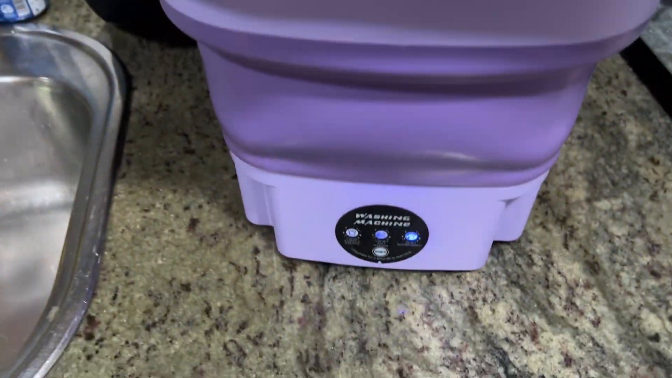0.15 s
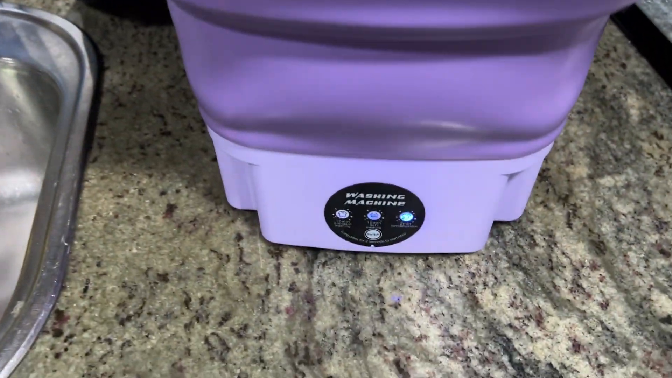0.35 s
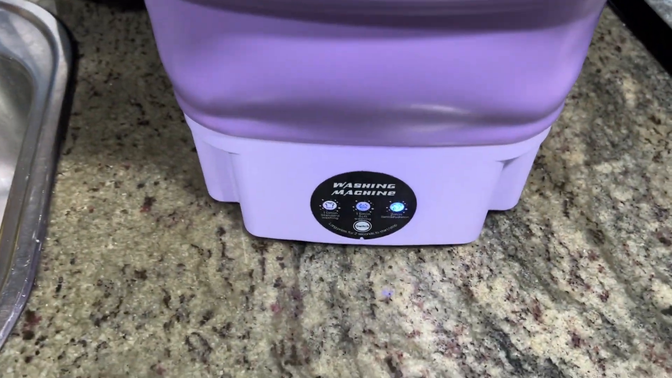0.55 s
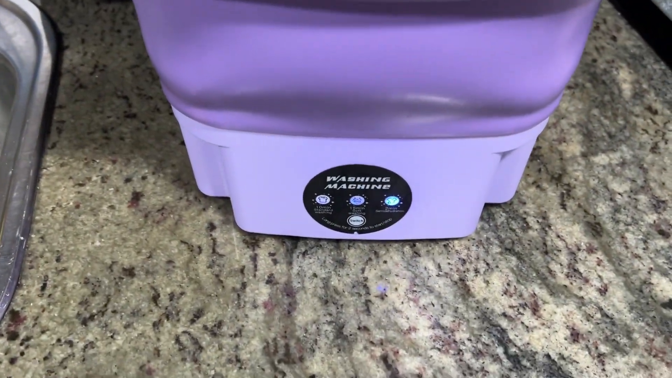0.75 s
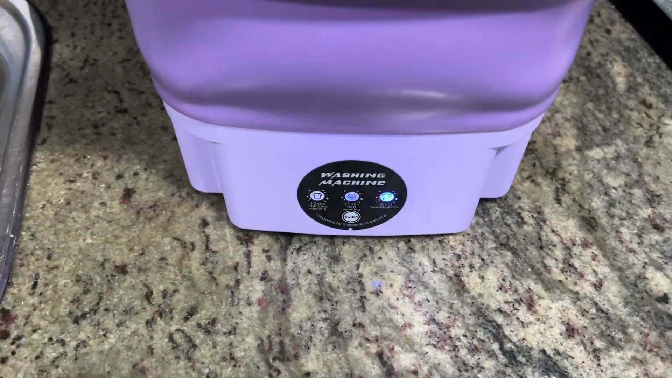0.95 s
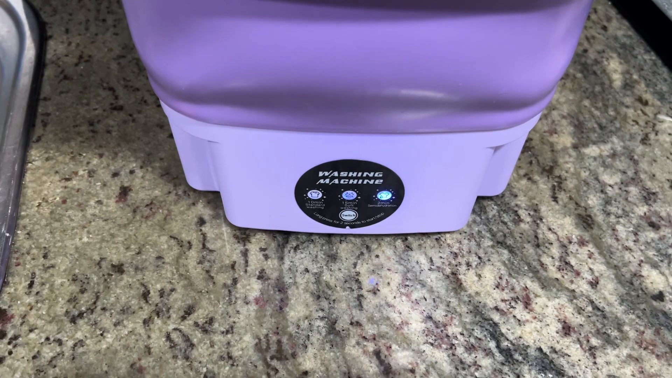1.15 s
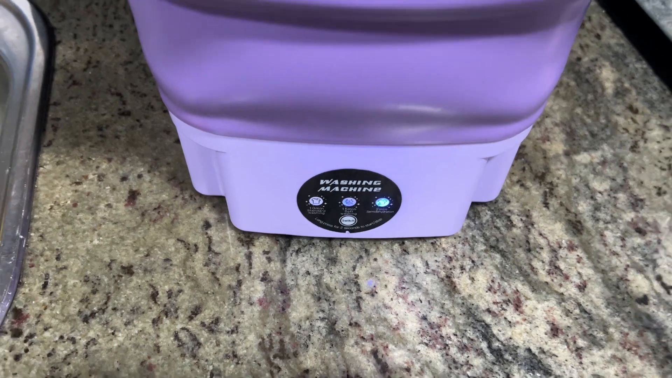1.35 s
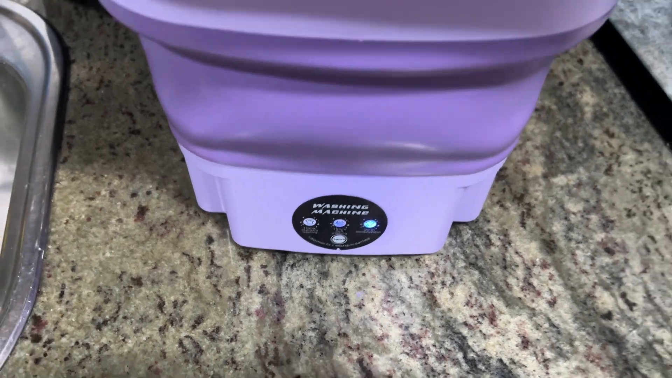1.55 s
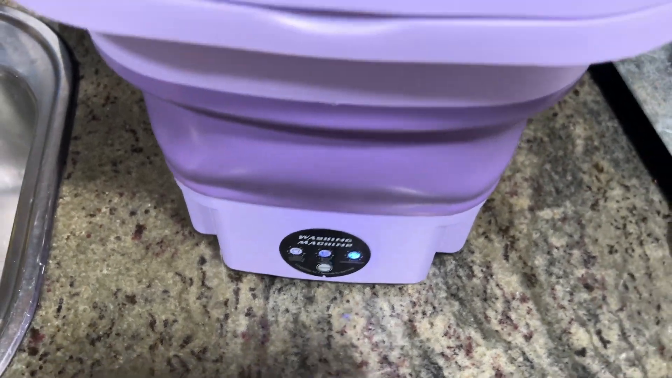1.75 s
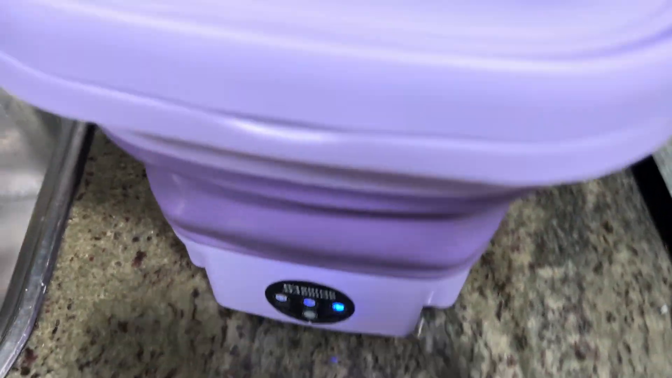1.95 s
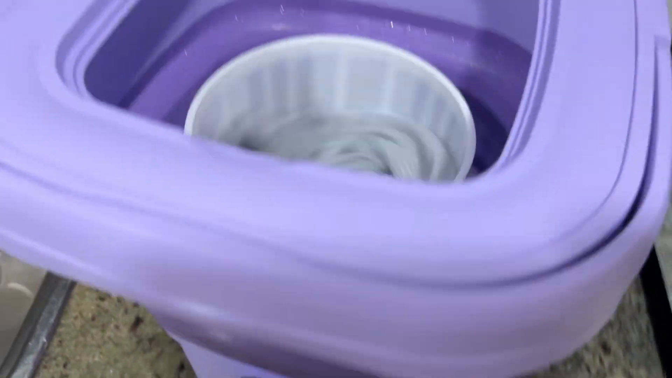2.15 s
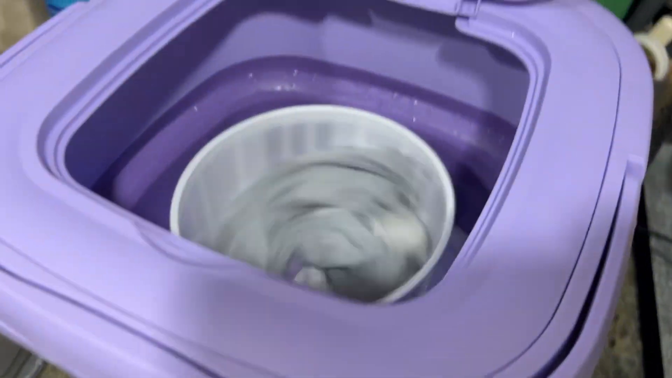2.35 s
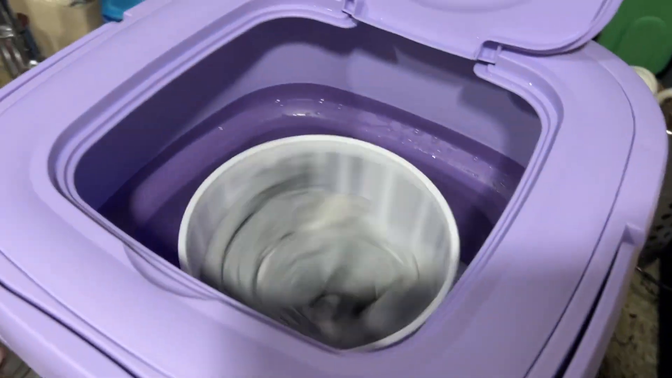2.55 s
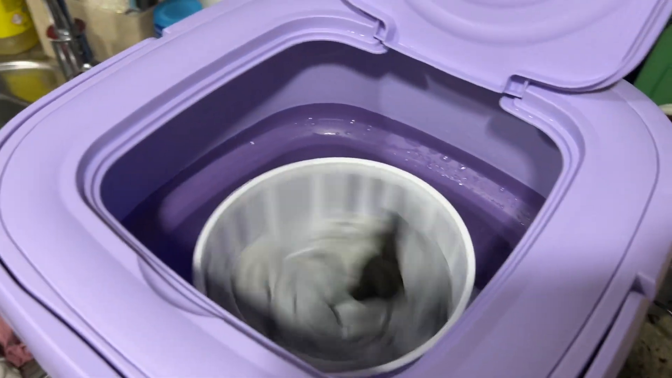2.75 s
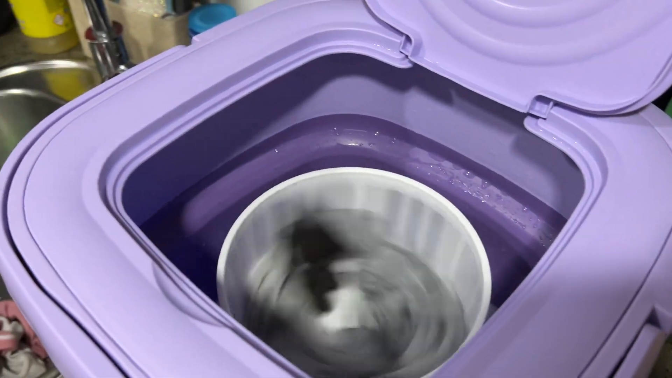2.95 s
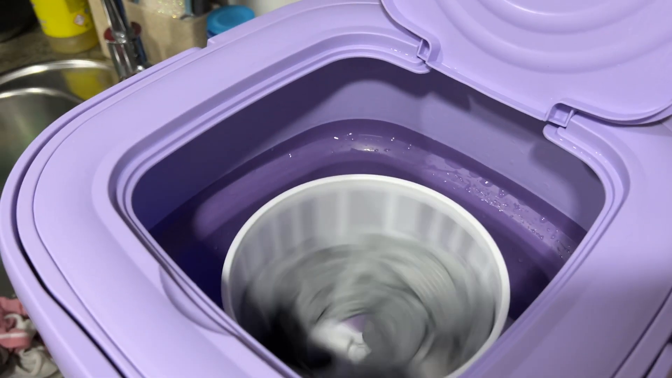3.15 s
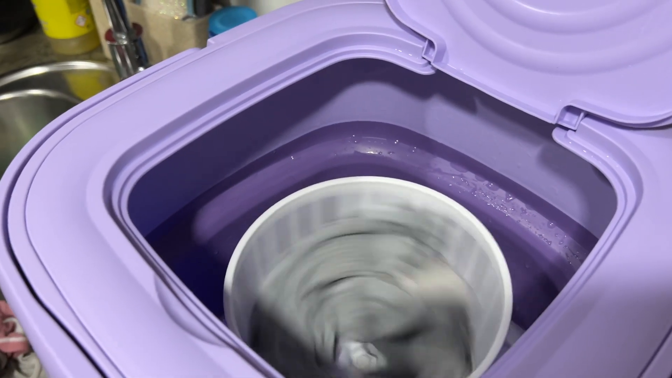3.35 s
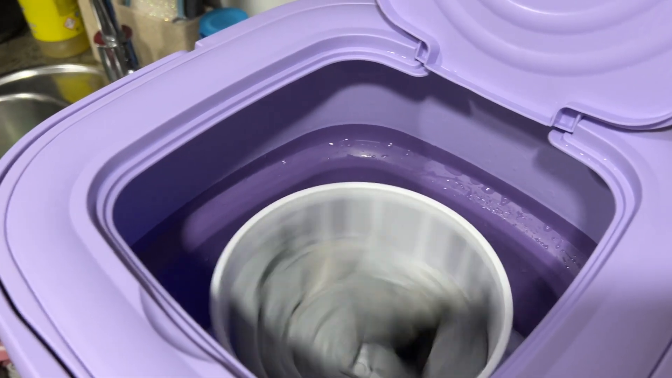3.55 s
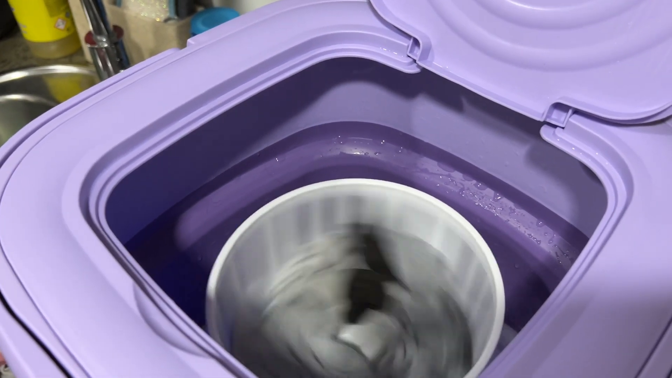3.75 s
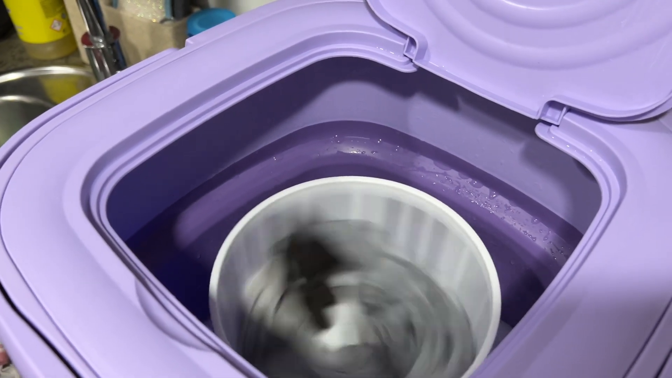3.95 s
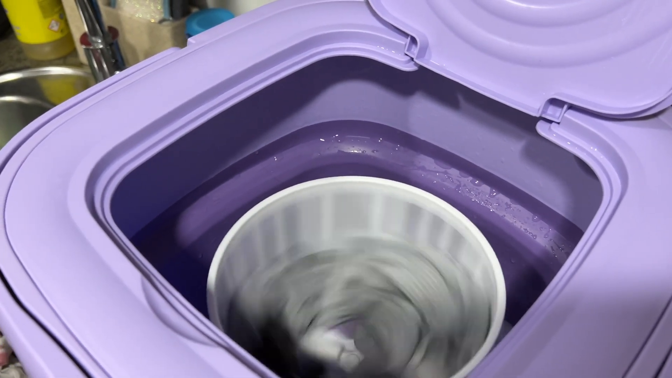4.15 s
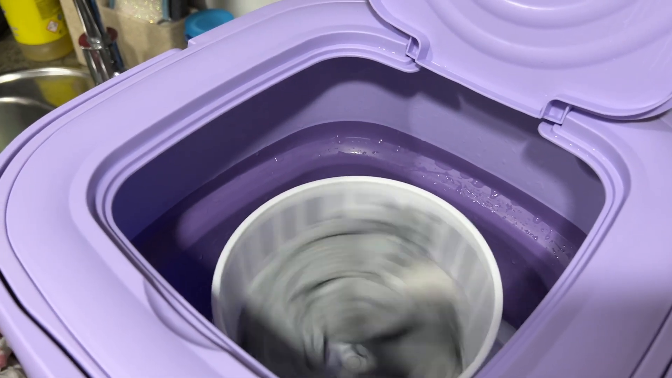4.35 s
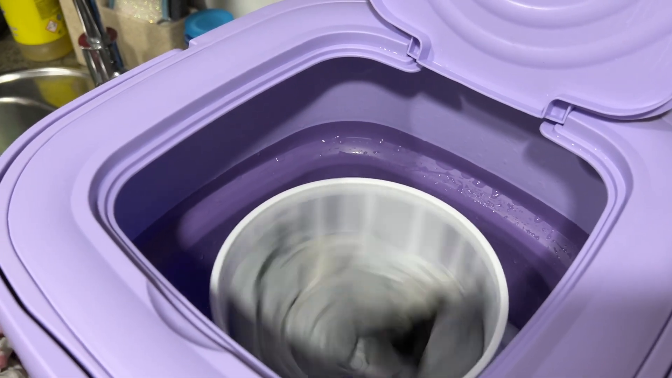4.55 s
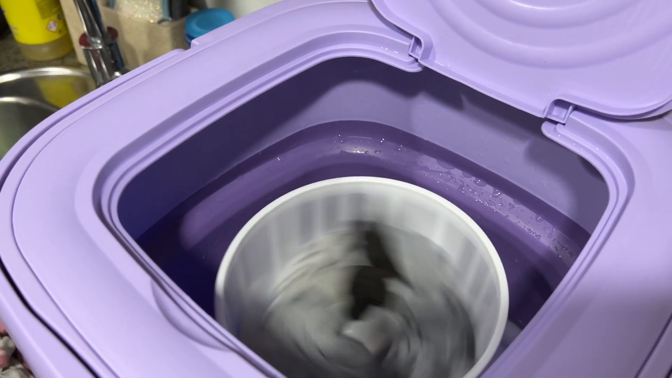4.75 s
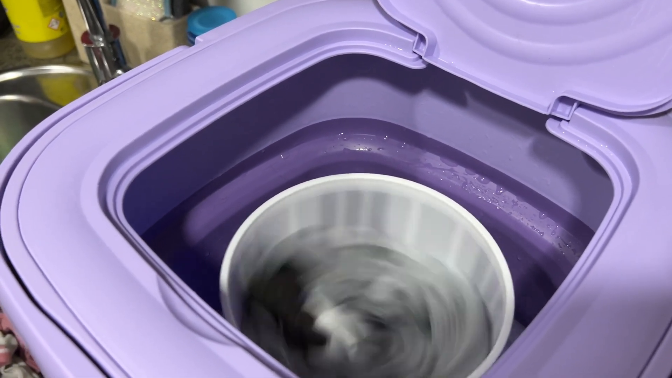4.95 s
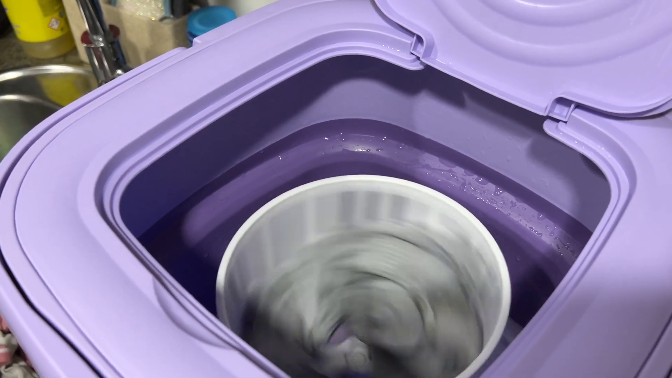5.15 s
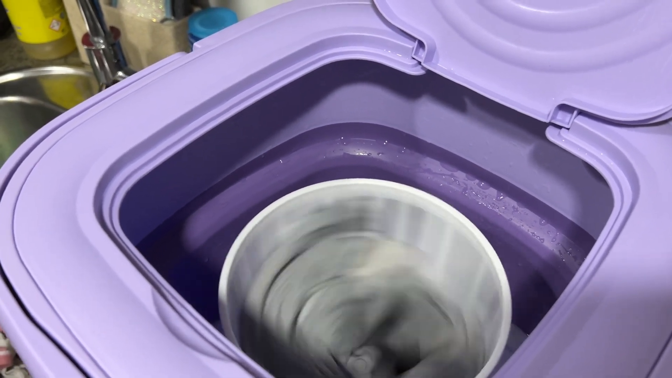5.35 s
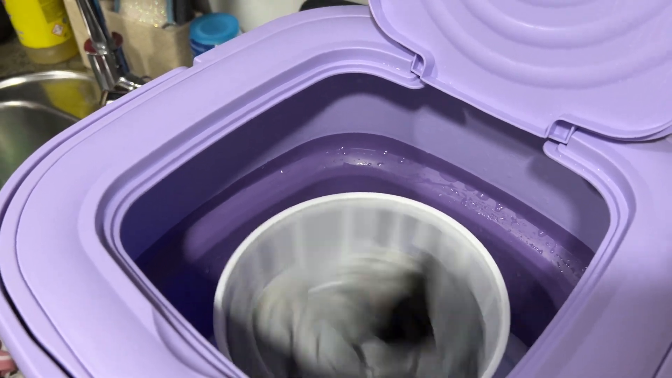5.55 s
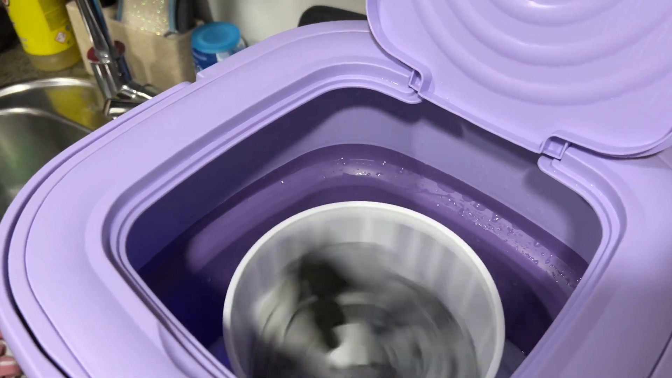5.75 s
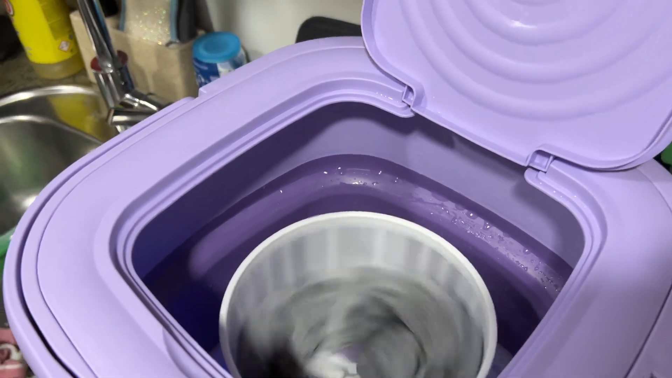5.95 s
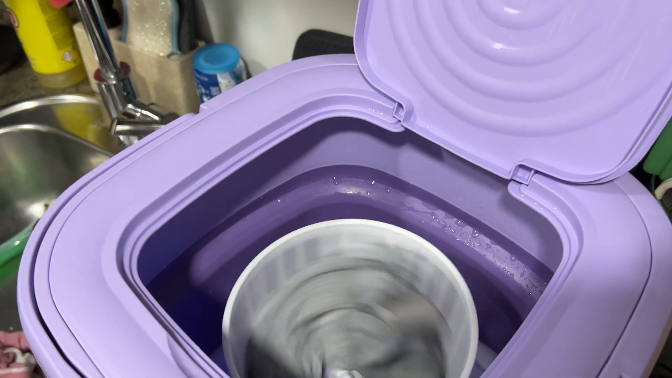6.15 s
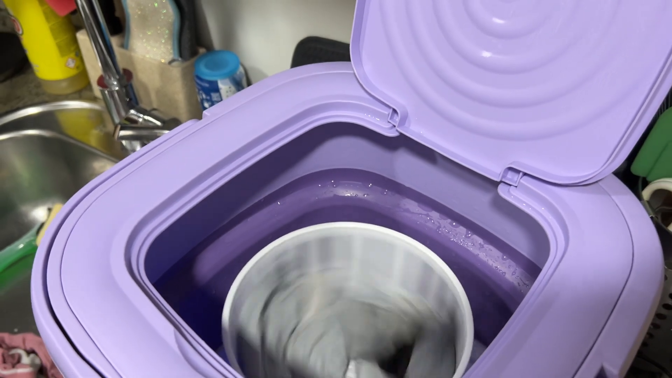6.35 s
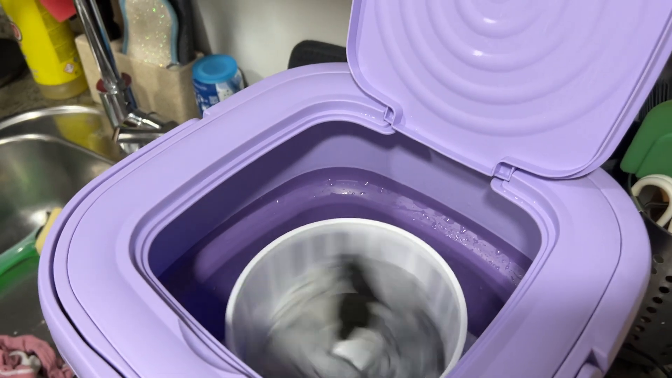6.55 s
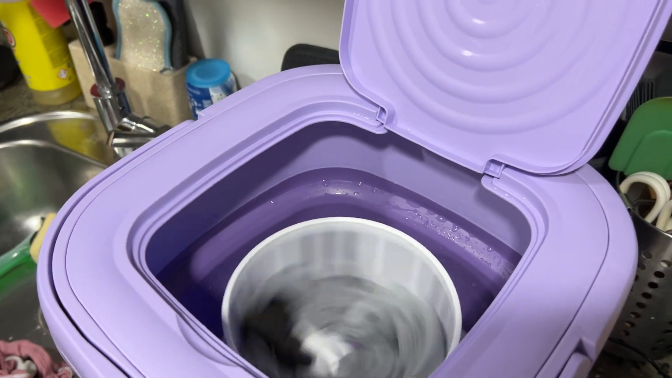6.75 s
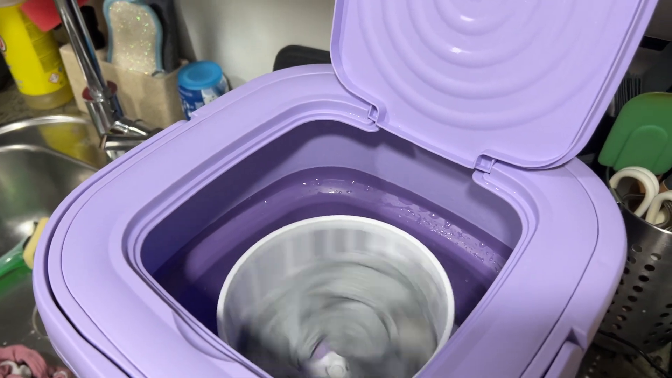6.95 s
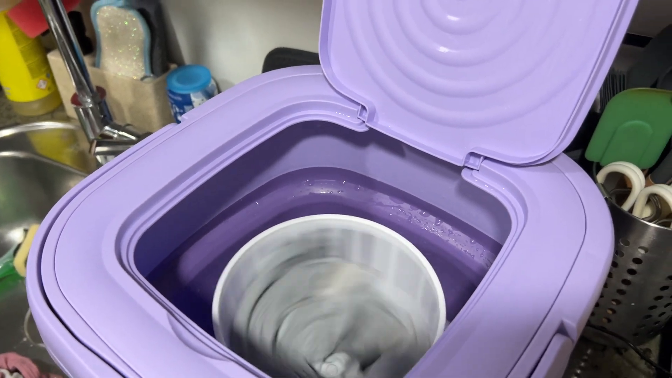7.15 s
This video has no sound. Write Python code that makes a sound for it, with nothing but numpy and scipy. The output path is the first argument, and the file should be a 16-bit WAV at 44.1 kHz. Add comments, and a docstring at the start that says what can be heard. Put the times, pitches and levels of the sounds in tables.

```python
"""A small motor hums and rattles in a folding plastic mini washing machine on a kitchen counter.
The microphone rises from its front to above the open tub, where the second motor order booms.
The pinion whines in short bursts and the gear train rattles in the case and tub, throbbing with an off-centre
gear and an unevenly loaded drum. Hiss, low rumble, soft handling bumps, one tick and a thin ring are added."""
import sys
import numpy as np
from scipy import signal
from scipy.fft import rfft, irfft
from scipy.io import wavfile

SR = 44100
rng = np.random.default_rng(int(sys.argv[2]) if len(sys.argv) > 2 else 0)


def generate_wav(signal):
    """Clip the signal to [-1, 1] and save it as 16-bit WAV at the path in sys.argv[1]."""
    frames = np.transpose(np.atleast_2d(signal))
    scaled = np.clip(frames, -1, 1) * 32767
    pcm = np.round(scaled).astype(np.int16)
    wavfile.write(sys.argv[1], SR, pcm)


N = 317520
T = np.arange(N) / SR
FREQS = np.maximum(np.arange(N // 2 + 1) * SR / N, 1)

MOTOR_HZ = 249.95
PINION_TEETH, GEAR_RATIO, DRUM_RATIO = 10, 16.795, 40.97  # ratios: motor turns per turn
REPEAT_TURNS = 84  # motor turns until the same teeth meet again

# parts heard along the path: front_db, rim_db, above_tub_db, edge_change_db, follow_db_per_db of closeness
PART_LEVELS = {"case": (-49, -49.5, -49, -2, 0.2), "tub": (-56, -53, -51, -0.5, 0),
               "gearbox": (-47.5, -46, -47, -0.5, 0.7), "warble": (-55.5, -47.5, -51.8, 3, 3),
               "whine overtones": (-60, -61, -56.5, -1, 0.5), "hiss": (-66.6, -64.5, -64.5, 1.7, 0.58),
               "first order": (-52, -50, -48.5, -0.5, 0.5), "third order": (-48.5, -51.5, -55.5, 4.5, 0.54)}


def undb(db):
    """Decibels to gain."""
    return np.exp(np.log(10) / 20 * np.asarray(db))


def unit(x):
    """Scale to an rms of one."""
    return x / np.sqrt(np.mean(x ** 2))


def curves(table):
    """The columns of a timed table, sample by sample."""
    s, *columns = np.transpose(table)
    return [np.interp(T, s, c) for c in columns]


def across(points):
    """Join (Hz, value) points on a log-frequency axis."""
    hz, value = np.transpose(points)
    return np.interp(np.log(FREQS), np.log(hz), value)


def resonances(modes):
    """Gain over frequency of a set of steep-sided resonances, summed in power."""
    power = 0
    for hz, width_hz, db in modes:
        detuning = (FREQS / hz - hz / FREQS) * hz / width_hz
        power = power + (undb(db) / (1 + detuning ** 2)) ** 2
    return np.sqrt(power)


def walk(rate_hz):
    """Smooth chance with a spread of one, changing about rate_hz times a second."""
    count = N // 50
    slow = rfft(rng.standard_normal(count))
    slow = unit(irfft(slow / (1 + (FREQS[:len(slow)] / rate_hz) ** 2), count))
    return np.interp(T, np.linspace(0, T[-1], count), slow)


def recurring(motor, chance, share):
    """A share of the chance comes round again whenever the same teeth meet, every REPEAT_TURNS motor turns."""
    place = (motor % REPEAT_TURNS * SR / MOTOR_HZ).astype(int)
    return np.sqrt(share) * chance()[..., place] + np.sqrt(1 - share) * chance()


def swing(turns, at):
    """Rises and falls once a turn, highest at the given share of the turn."""
    return np.cos(2 * np.pi * (turns - at))


def heave(turns, at, skew=0.33):
    """A swing that rises faster than it falls, as a lopsided load comes round."""
    return swing(turns, at) + skew * swing(2 * (turns - at), -1 / 4)


def by_place(height, place_db):
    """Blend the levels in front, at the rim and above the tub."""
    return np.interp(height, [0, .5, 1], place_db)


def tone(turns, lead_rad):
    """A clean tone of rms one at the two ports; the left leads by lead_rad."""
    return np.sqrt(2) * np.cos(2 * np.pi * turns + lead_rad * np.array([[.5], [-.5]]))


def panned(db, pan_db):
    """Left and right gains for a level and a left minus right difference."""
    return undb(db + pan_db * np.array([[.5], [-.5]]))


def ports(pair, gain=1):
    """Two unrelated signals become left and right: alike in the bass, diffuse higher, out of step at the top."""
    # likeness of the two microphone ports: pitch_hz, likeness 0-1
    likeness = [(30, 0.96), (60, 0.73), (300, 0.92), (600, 0.8), (1000, 0.68), (2000, 0.61), (3200, 0.051),
                (4500, 0.14), (7000, 0.14), (9500, 1), (15000, 1)]
    # phase of the ports: pitch_hz, left_lead_rad
    lead = [(20, 0), (6500, 0), (7800, -.6), (9300, -2.6), (10900, -3.6), (12800, -5.9), (14300, -6.8),
            (15500, -8.6)]
    # balance of the ports: pitch_hz, left_minus_right_db
    tilt = [(60, -2), (200, 1.5), (700, -1), (1290, 1), (1900, 0.5), (2450, -4), (3200, 0.5), (4400, 4),
            (8000, 1), (15000, -1)]
    like = across(likeness)
    mid, side = rfft(pair) * gain * np.sqrt([1 + like, 1 - like])
    left = undb(across(tilt) / 2) * np.exp(.5j * across(lead))
    return irfft(np.array([(mid + side) * left, (mid - side) / left]), N)


def tooth_load(gear, drum, gear_db=1.8, unsteady_db=1.25, give_db=7):
    """Tooth pressure in dB: the off-centre gear binds once a turn, hardest at a tight spot of the drum."""
    # where drum and gear bind together: drum_turn_share, drum_narrowness, gear_turn_share, gear_narrowness, push_db
    tight_spots = [(.12, 6, .27, .36, 7), (.4, 1.25, .08, 1.1, 7.2), (.7, 2.4, .17, 1.5, 4.7)]
    tight_db = 0
    for drum_at, drum_narrow, gear_at, gear_narrow, db in tight_spots:
        nearness = drum_narrow * (swing(drum, drum_at) - 1) + gear_narrow * (swing(gear, gear_at) - 1)
        tight_db = tight_db + db * np.exp(nearness)
    push_db = gear_db * swing(gear, 0.39) + tight_db - tight_db.mean() + unsteady_db * walk(50)
    return give_db * np.tanh(push_db / give_db)  # plastic teeth give way under the hardest pushes


def shafts(load_db, sag_per_db=0.0006, flutter=0.0006):
    """Turns of the motor: it sags by a small share for each dB of tooth load, and flutters."""
    return np.cumsum(MOTOR_HZ * (1 - sag_per_db * load_db - flutter * walk(25))) / SR


def boom(motor, drum, sway_db=0.92, waver_db=0.42):
    """The second order booms in the tub and heaves with the drum; at a node it dips, the ports nearly opposite."""
    # boom along the path, node just below the rim: time_s, level_db, left_minus_right_db, left_lead_rad
    boom_path = [(0, -54, -6, .7), (0.6, -48.3, -6.5, .75), (1.2, -49, -6.5, 1), (1.5, -52.3, -6, 1.4),
                 (1.63, -53, -1.5, 2.9), (1.7, -52.5, 2.5, 1.7), (1.8, -54, 8, 1.2), (2.0, -45, 3, .8),
                 (2.2, -35.7, -3, .4), (2.45, -33, 0.7, .2), (3.1, -30.5, 0.2, .15), (3.8, -30.5, 1.7, .15),
                 (4.9, -30.5, 1, .15), (5.8, -31, 0.6, .15), (6.5, -32, 1.1, .15), (7.15, -33.5, 2, .15)]
    level_db, pan_db, lead_rad = curves(boom_path)
    level_db = level_db + sway_db * heave(drum, 0.9) + waver_db * walk(36)
    return tone(2 * motor, lead_rad) * panned(level_db, pan_db)


def hum(motor, drum, levels_db, height, waver_db=-0.56):
    """The first and third motor orders, clean and swaying with the drum."""
    # clean orders: order, front_left_minus_right_db, above_tub_left_minus_right_db, left_lead_rad, sway_db,
    # peak_drum_turn_share
    clean_orders = {"first order": (1, -.8, .2, 0.075, -0.24, 0.82),
                    "third order": (3, 2.7, 18.6, 1.84, 0.79, 0.35)}
    out = 0
    for part, (order, front_pan_db, top_pan_db, lead_rad, sway_db, at) in clean_orders.items():
        db = levels_db[part] + sway_db * heave(drum, at) + waver_db * walk(36)
        pan_db = front_pan_db + (top_pan_db - front_pan_db) * height
        out = out + tone(order * motor, lead_rad) * panned(db, pan_db)
    return out


def knocks(motor, gain, lean_db, scatter_db, pole_db=0, worn=0.33):
    """Noise pulsed by shaft side, three motor poles and each tooth pair's own force rings a body; rms one."""
    count = PINION_TEETH * REPEAT_TURNS
    pair_index = (PINION_TEETH * motor).astype(int) % count
    fit = np.tanh(rng.standard_normal(count))[pair_index]
    force = undb(lean_db * swing(motor, 0) + pole_db * swing(3 * motor, 0) + scatter_db * fit)
    noise = recurring(motor, lambda: rng.standard_normal((2, N)), worn)
    return unit(ports(force * noise, gain))


def rattle(motor, drum, load_db, case_db, tub_db, height, panel_db=-55):
    """Tooth knocks ring the case, its front panel and the tub; the drum rocks case and tub twice a turn."""
    # plastic case: pitch_hz, width_hz, relative_db
    case_modes = [(240, 97, -5.5), (330, 170, -8), (738, 118, -5), (803, 42, 2), (832, 44, 1.3),
                  (912, 75, 0), (992, 70, -4), (1038, 55, -5)]
    # open tub: pitch_hz, width_hz, relative_db
    tub_modes = [(218, 45, -8), (368.5, 58, -3), (483.5, 78, 0.5), (1192, 70, -3), (1290, 130, -9),
                 (1428, 34, -6), (1524, 45, -6.5)]
    # front panel, fading as the microphone rises: pitch_hz, width_hz, relative_db
    panel_modes = [(1144, 450, 4.5), (1390, 120, -3), (1620, 160, 0), (3710, 1360, -7)]
    case = knocks(motor, resonances(case_modes), lean_db=-1.0, scatter_db=4.5, pole_db=2.0)
    tub = knocks(motor, resonances(tub_modes), lean_db=-9, scatter_db=-1.0)
    panel = knocks(motor, resonances(panel_modes), lean_db=-3, scatter_db=6.0)
    case = case * undb(case_db + 1.0 * swing(2 * drum, 0.057) + 0.12 * load_db)
    tub = tub * undb(tub_db + 1.3 * swing(2 * drum, 0.25) + 0.14 * load_db)
    panel = panel * (1 - height) * undb(panel_db + 0.26 * load_db)
    return case + tub + panel


def gearbox(motor, drum, load_db, gear_db, pinion_db, near_db):
    """Tooth knocks ring the gearbox and the pinion, and the teeth scrape in time with the load."""
    # gearbox: pitch_hz, width_hz, relative_db
    gear_modes = [(1755, 150, 4.5), (1882, 85, 6.5), (2001, 125, 6.5), (2245, 110, 0.5), (3170, 220, -1)]
    # pinion: pitch_hz, width_hz, relative_db
    pinion_modes = [(2534, 310, -1.5), (2790, 80, 2.5), (2917, 89, -1.5)]
    # gear wheels, rung by the scraping teeth: pitch_hz, width_hz, relative_db
    wheel_modes = [(2010, 120, 8), (3440, 170, 4), (3950, 400, -4)]
    # dry scrape of the teeth: pitch_hz, relative_db per Hz
    scrape_colour = [(300, -10.5), (600, -13), (1500, -3), (3000, -5.5), (3900, -2.5), (4500, -4.5),
                     (5400, -11), (6300, -11), (8500, -12), (12500, -13), (15500, -12.5)]
    ring = knocks(motor, resonances(gear_modes), lean_db=-1.0, scatter_db=3)
    pinion = knocks(motor, resonances(pinion_modes), lean_db=2.0, scatter_db=2.0)
    scrape_gain = np.hypot(undb(across(scrape_colour)), resonances(wheel_modes))
    scrape = knocks(motor, scrape_gain, lean_db=1.0, scatter_db=1.5, pole_db=1.0)
    ring = ring * undb(gear_db - 4.5 + 0.05 * load_db + 1.56 * swing(drum, 0.95))
    pinion = pinion * undb(pinion_db + 4.2 + 0.047 * load_db + swing(drum, 0.51))
    return ring + pinion + scrape * undb(-52.5 + near_db + 1.0 * load_db)


def tub_echo(x, drum, lag_s=0.0031, rock_s=0.00023, wander_s=0.00038, echo_db=-8):
    """The soft, rocking tub wall throws the works back with a changing delay, so the resonances waver."""
    late_s = T - lag_s - rock_s * swing(drum, 0.1) - wander_s * walk(2.98)
    echo = np.array([np.interp(late_s, T, channel) for channel in x])
    return (x + undb(echo_db) * echo) / np.hypot(1, undb(echo_db))


def buzz(motor, drum, load_db, height, flicker_db=4.5, sway_db=1.6, rock_db=3.0,
         shake_rad=0.095, smear_turns=0.013, glide_rad=0.06):
    """A smeared kick a turn makes higher motor orders, each answering load and the case's four rocks a drum turn."""
    # by motor order: front_db, rim_db, above_tub_db (all relative), follow_db_per_db of load, peak_drum_turn_share
    buzz_orders = {4: (-70, -60.5, -68.5, .5, .66), 5: (-54.5, -56.5, -58, -.8, .5),
                   6: (-64.5, -57.5, -58.5, .6, .98), 7: (-60.5, -57, -62.5, 0., .84),
                   8: (-67.5, -62, -65.5, .6, .02), 9: (-63.5, -70, -72, .7, .68),
                   11: (-70, -68, -64.5, 0., .6), 12: (-74, -72, -70.5, .2, .76),
                   18: (-84, -82, -81, 1., .3), 23: (-84, -85, -83, 1.2, .2), 25: (-86, -85, -84, 1.4, .2)}
    strain_db = load_db + rock_db * swing(4 * drum, .45)
    quarter = np.array([[0], [1 / 4]])  # turns between the two signals
    out = 0
    for order, (*place_db, follow, at) in buzz_orders.items():
        turns = order * motor - smear_turns * order ** 2 + quarter
        bend_rad = order * (shake_rad * walk(25) + glide_rad * swing(3 * drum, 0.081))
        level_db = 1.0 + by_place(height, place_db) + flicker_db * np.tanh(walk(40))
        level_db = level_db + follow * strain_db + sway_db * swing(drum, at)
        out = out + np.cos(2 * np.pi * turns + bend_rad) * undb(level_db)
    return ports(out)


def whine(motor, load_db, drum, pinion_db, overtones_db, sway_db=2.0, flicker_db=5.0, worn=0.5,
          slip_rad=1.0, twist_rad_per_db=0.04):
    """The pinion sings at its tooth rate in recurring bursts under load; backlash and twist bend each into a chirp."""
    # one, two and three times the tooth rate: relative_db, follow_db_per_db of load
    whine_partials = [(2.4, 1.9), (-10.3, 3.2), (-22.5, 2.8)]
    # the shaft twists under load
    play_rad = slip_rad * recurring(motor, lambda: walk(15), worn) + twist_rad_per_db * load_db
    out = 0
    for multiple, (db, follow) in enumerate(whine_partials, 1):
        angle = multiple * (2 * np.pi * PINION_TEETH * motor + play_rad)
        flutter = np.tanh(recurring(motor, lambda: walk(60), worn))
        wave = np.sin(angle + np.array([[0], [np.pi / 2]])) * undb(follow * load_db + flicker_db * flutter)
        level_db = pinion_db + sway_db * swing(drum, 0.42) if multiple == 1 else overtones_db
        out = out + undb(db + level_db) * unit(wave)
    return ports(out)


def warble(drum, load_db, level_db, pitch_hz=1218, waver_hz=32, flicker_db=2.0, rock_db=1.5, slack_db_per_db=.6):
    """As the load eases, the slack teeth chatter in short wavering beads of tone."""
    angle = 2 * np.pi * np.cumsum(pitch_hz + waver_hz * walk(39.83)) / SR
    wave = np.sin(angle + np.array([[.5], [-.5]]))
    beads = undb(flicker_db * walk(38) + rock_db * swing(drum, 0.47) - slack_db_per_db * load_db)
    return unit(wave * beads) * panned(level_db, pan_db=5.0)


def tooth_tick(start_s=4.6, pitch_hz=3480, decay_s=.004, level_db=-48):
    """One tooth catches and ticks the gear wheel: a short decaying sine."""
    age = np.clip(T - start_s, 0, 1)
    return undb(level_db) * age / decay_s * np.exp(1 - age / decay_s) * np.sin(2 * np.pi * pitch_hz * age)


def thin_ring(start_s=3.58, pitch_hz=7080, t60_s=2.4, level_db=-62.98):
    """A faint high ring swells quickly and dies away."""
    age = np.maximum(T - start_s, 0)
    envelope = undb(level_db - 60 * age / t60_s) * (1 - np.exp(-age / 0.019))
    return envelope * np.sin(2 * np.pi * pitch_hz * T + np.array([[0], [np.pi / 2]]))


def bumps():
    """The hand shifts on the microphone: soft thuds, sines under short swelling and decaying envelopes."""
    # bumps: start_s, pitch_hz, decay_s, level_db before a 1 dB cut
    hand_bumps = [(1.36, 41.4, .03, -58), (1.648, 44.8, 0.03, -55), (1.795, 50.3, .018, -51),
                  (1.862, 50, .045, -52), (1.89, 116, 0.0023, -39), (1.995, 66.7, 0.01, -55),
                  (2.464, 42, .035, -55), (2.532, 49.6, 0.011, -54), (6.5, 47.5, 0.022, -54)]
    out = 0
    for start_s, pitch_hz, decay_s, level_db in hand_bumps:
        out = out + tooth_tick(start_s, pitch_hz, decay_s, level_db - 1)  # same envelope as the tick
    return out


def air(level_db, load_db, height, rumble_db=-61.0, handling_db=4):
    """Fine hiss throbs lightly with the gears, over a low rumble that grows while the hand lifts the microphone."""
    # hiss, brightest in a band near 12 kHz: pitch_hz, relative_db per Hz
    hiss_colour = [(2000, -12.5), (6000, -4), (8000, -6), (10000, -5.5), (12200, 14.5), (13500, 6),
                   (15500, -7.5)]
    # room rumble: pitch_hz, relative_db per Hz
    rumble_colour = [(15, -17), (28, -17.5), (40, 3.5), (60, -3.5), (100, -4), (160, -8), (400, -24),
                     (1500, -29)]
    hiss = unit(ports(rng.standard_normal((2, N)), undb(across(hiss_colour))))
    rumble = unit(ports(rng.standard_normal((2, N)), undb(across(rumble_colour))))
    lifting = height * (1 - height)
    hiss = hiss * undb(level_db + 0.29 * load_db + .7 * walk(35))
    return hiss + rumble * undb(rumble_db + handling_db * lifting / lifting.max())


def microphone(rim_s=1.95, lift_s=0.18, edge_s=2.39, edge_length_s=0.24):
    """One smooth lift: height (0 front, 1 above the tub), crossing of the opening's edge (0-1), closeness in dB."""
    # the hand brings the microphone nearer and draws it back: time_s, closeness_db
    closeness = [(0, -4.5), (.7, -4.5), (1.15, -3), (1.7, -2), (3.1, 0), (3.8, 0.7), (5.8, 0), (7.2, -4)]
    height = 1 / (1 + np.exp((rim_s - T) / lift_s))
    edge = np.exp(-((T - edge_s) / edge_length_s) ** 2)
    return height, edge, curves(closeness)[0]


def heard(part, height, edge, closeness_db):
    """Level in dB of one part of the machine from where the microphone is."""
    *place_db, edge_db, follow = PART_LEVELS[part]
    return by_place(height, place_db) + edge_db * edge + follow * closeness_db


def scene():
    """One motor drives every machine layer through the gear train; the microphone's place sets their balance."""
    # band in which the pinion rings: time_s, level_db of the whole band
    pinion_band = [(0.1, -60), (0.18, -57), (1.31, -57.5), (1.74, -62), (1.99, -57.5), (3.26, -54),
                   (5.56, -54.5), (5.6, -51.5), (7.1, -52)]
    gear, drum = MOTOR_HZ * T / GEAR_RATIO, MOTOR_HZ * T / DRUM_RATIO
    load_db = tooth_load(gear, drum)
    motor = shafts(load_db)
    height, edge, closeness_db = microphone()
    db = {part: heard(part, height, edge, closeness_db) for part in PART_LEVELS}
    pinion_db = curves(pinion_band)[0] - 5.5  # the pinion's share of its band
    near_db = db["hiss"] - np.median(db["hiss"])  # the treble tells how directly the microphone faces the works
    drone = boom(motor, drum) + hum(motor, drum, db, height)
    works = rattle(motor, drum, load_db, db["case"], db["tub"], height)
    works = works + gearbox(motor, drum, load_db, db["gearbox"], pinion_db, near_db)
    tones = buzz(motor, drum, load_db, height)
    tones = tones + whine(motor, load_db, drum, pinion_db, db["whine overtones"])
    tones = tones + warble(drum, load_db, db["warble"])
    details = tooth_tick() + thin_ring() + bumps()
    return drone + tub_echo(works, drum) + tones + details + air(db["hiss"], load_db, height)


def record(dry, top_hz=15700):
    """The recorder cuts the top steeply with an elliptic low-pass."""
    return signal.sosfilt(signal.ellip(10, .2, 80, top_hz, fs=SR, output="sos"), dry)


dry = scene()
out = record(dry)
generate_wav(out)
```